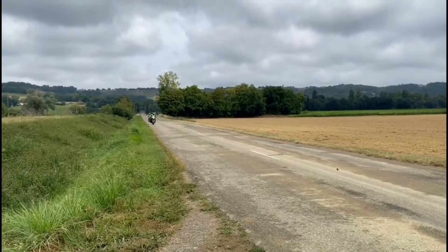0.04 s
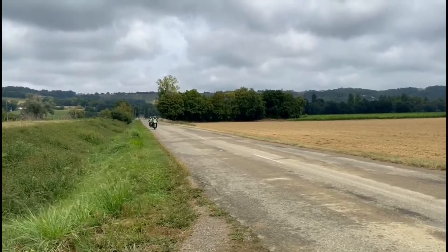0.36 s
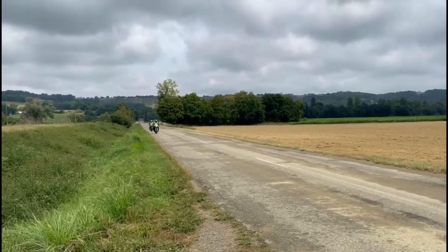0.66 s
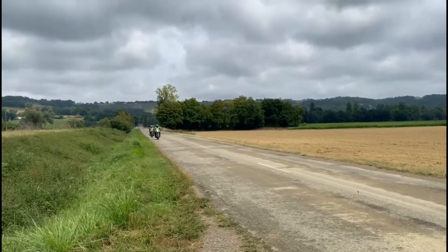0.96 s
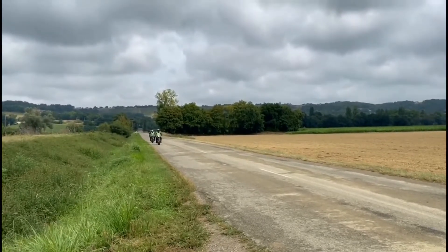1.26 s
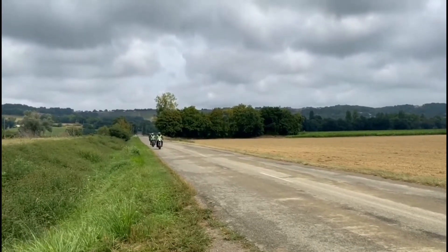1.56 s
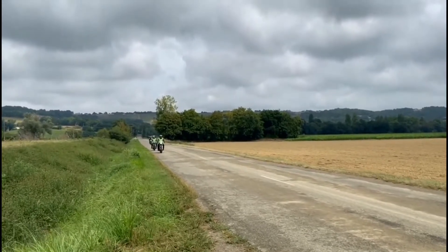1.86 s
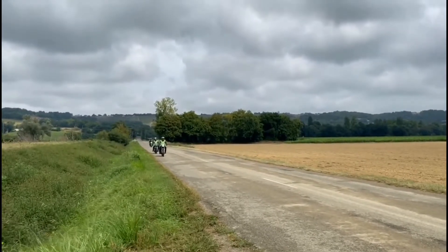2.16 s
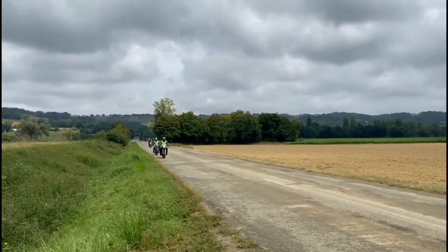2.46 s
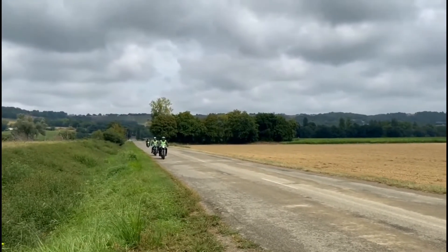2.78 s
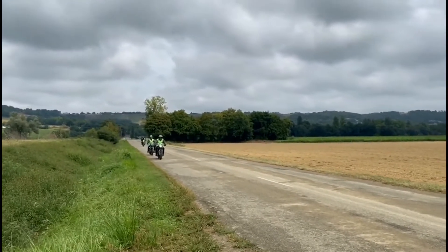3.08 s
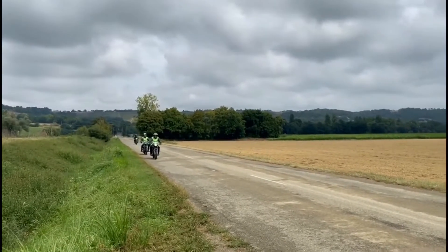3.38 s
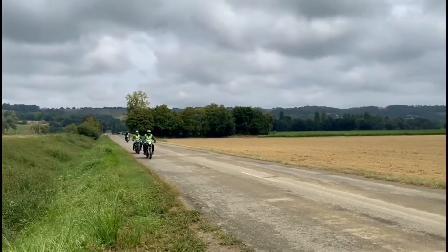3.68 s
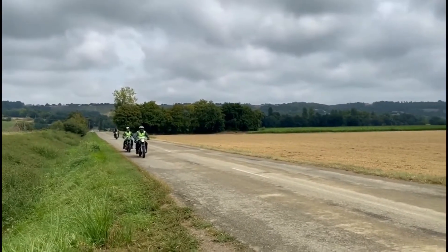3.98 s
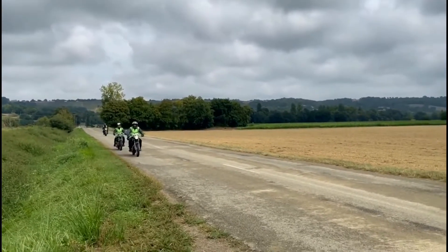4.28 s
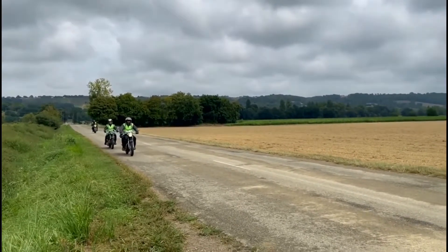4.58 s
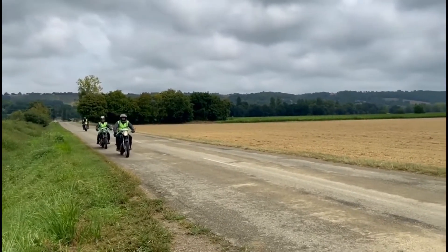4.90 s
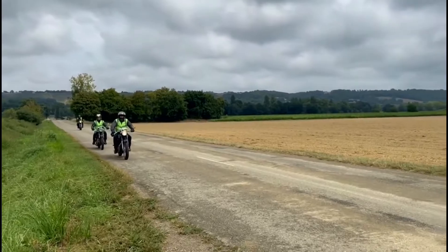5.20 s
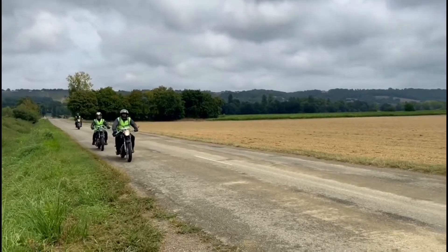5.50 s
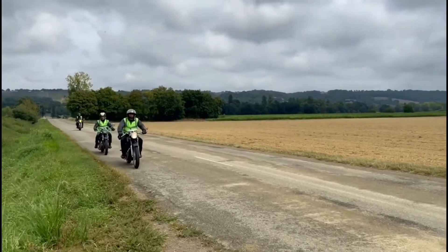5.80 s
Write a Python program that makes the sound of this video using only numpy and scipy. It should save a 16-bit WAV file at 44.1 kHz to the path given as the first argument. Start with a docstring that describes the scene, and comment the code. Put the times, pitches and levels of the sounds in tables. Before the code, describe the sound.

Three old motorcycles approach along an open country road, heard in stereo from the roadside. In the first second the leading single-cylinder engine fires unevenly, with two dull thumps and a quick string of exhaust bangs as the throttle opens. At about 1.1 seconds it settles into a fast, steady, low thumping, which slows gradually while growing louder. The two engines behind throb more dully at other rates, beating against it. Valve clatter, hiss, tyre roar and a light chain rattle build throughout. From about 2 to 4 seconds the engine metal rings thinly under load. Around 3.5 seconds the leader gains a harder, closer thud, and just after 4 seconds the clatter shifts slightly left. A soft gear whine stands out around 4.5 to 5.5 seconds. Small clicks fall near 0.2, 1.2 and 4.8 seconds, over a faint breeze rumble. The bikes are still approaching at nearly 6 seconds.

```python
"""An old single-cylinder motorcycle approaches along a country road, with two more behind it.
Each firing is an impulse that excites the resonances of a silencer. The leader fires unevenly, picks
up, then thumps steadily as its engine slows; the others, firing at other rates, beat against it.
Valve impacts ring the metal, gears whine at their mesh frequency, a chain rattles and tyres roar.
The sound grows as the distance falls, and reaches two microphone ports in a light breeze."""
import sys
import numpy as np
from scipy import signal
from scipy.fft import rfft, irfft
from scipy.io import wavfile

SR = 44100
rng = np.random.default_rng(int(sys.argv[2]) if len(sys.argv) > 2 else 0)


def generate_wav(signal):
    """Clip the signal to [-1, 1] and save it as 16-bit WAV at the path in sys.argv[1]."""
    frames = np.transpose(np.atleast_2d(signal))
    scaled = np.clip(frames, -1, 1) * 32767
    pcm = np.round(scaled).astype(np.int16)
    wavfile.write(sys.argv[1], SR, pcm)


N = 257984

# firing rates of the leading and third engines: t/s, f/Hz
LEAD_FIRING_RATE = [(0, 15.649), (.533, 14.938), (1.07, 20.141), (2.087, 18.463), (2.943, 17.685),
                    (3.809, 16.325), (5.192, 14.69), (5.85, 14.441)]
THIRD_FIRING_RATE = [(0, 14.3), (1.2, 17), (3, 14.8), (5.85, 13.3)]
# the leader's throttle, snapped open, held, then eased: t/s, opening (0-1)
THROTTLE = [(0, 0), (.58, 0.22), (.88, 1), (3.6, 0.8), (4.25, 0.69), (5.85, 0.47)]
# the leader's dull thumps at idle and hard bangs as it picks up: t/s, level/dB
IDLE_THUMPS = [(.124, -24), (.242, -25)]
EXHAUST_BANGS = [(.180, -30.5), (.320, -23.5), (.385, -29.5), (.447, -24.5), (.577, -22.5), (.645, -31),
                 (.710, -24), (.761, -25.5), (.818, -23.5), (.874, -22), (.928, -24), (.980, -22.5),
                 (1.084, -21.5)]
# small clicks close by: t/s, level/dB
CLICKS = [(.150, -29.5), (1.201, -28.5), (4.777, -27.5)]

# silencer resonances: f/Hz, bandwidth/Hz, relative level/dB
BOOM_MODES = [(60.5, 10.5, 0)]
BARK_MODES = [(125.8, 22.2, 2.2), (165.3, 7.2, 0)]
RASP_MODES = [(191, 11.5, 6), (231.7, 9.6, -4), (261.7, 19, 4.5), (299, 28, -6)]
PULL_MODES = [(256.3, 8.8, 3.5), (390, 110, -11.5), (460, 13, -2)]  # overtones while the engine pulls hardest
CRACK_MODES = [(245, 60, 0)]  # excited as the exhaust valve opens
THUD_MODES = [(102.4, 22, 0)]
BANG_MODES = [(120.4, 45, -0.49), (173, 20, 0.71)]
THUMP_MODES = [(71, 54, 0)]
FOLLOWER_MODES = [(54.9, 14.6, 3), (96.5, 30, -5), (152.2, 48, -5.5), (158, 20.7, -7.5), (230, 61, -24.5)]
# resonances of the engine's metal parts: f/Hz, bandwidth/Hz, relative level/dB
COVER_MODES = [(471, 22, -4.5), (818, 40, -11), (1456, 29, 6.5), (1636, 27, -6), (1810, 15, 6.5),
               (2344, 61, -3.5), (2945, 330, -6), (4080, 380, -5.5)]
CASTING_MODES = [(604, 72, 0.5), (699, 86, -2), (1650, 110, 2), (1780, 18, 6), (2623, 13, 3),
                 (3127, 130, -2.5), (4290, 180, -12), (6470, 6.4, -4)]
HIGH_RING_MODES = [(1430, 23, -2), (2040, 34, -7), (3120, 73, -4), (3580, 37, -5), (4100, 38, 1)]
KNOCK_MODES = [(702, 64, 0)]
METAL_RASP_MODES = [(3130, 120, 3), (3440, 190, -0.5)]

# noise spectra: f/Hz, relative spectral level/dB
TYRE_SPECTRUM = [(150, 2), (280, -4.5), (400, -3.5), (530, -6.5), (650, 0.5), (820, 1.5), (980, -5),
                 (1400, -6), (2200, -36)]
CLATTER_SPECTRUM = [(600, 7), (1000, -7.5), (1400, -1), (2100, 1.5), (3200, 0), (4100, -3.5), (4700, -1),
                    (9000, -31.5)]
HISS_SPECTRUM = [(3000, -12), (4500, -2), (5700, 3.5), (7000, 3), (8200, 0.5), (8900, -7.5), (11000, -6.5),
                 (13000, -13), (15500, -22)]
CHAIN_SPECTRUM = [(1500, -24), (3200, 6), (6500, -8.5), (9000, -1.5), (12000, -13), (15500, -13)]
BREEZE_SPECTRUM = [(20, -55), (33, -18), (48, 13.5), (62, 11.5), (85, 4), (130, 6), (200, -25), (400, -4.5),
                   (1200, -31), (3000, -53)]

# likeness of the noise at the two microphone ports: f/Hz, correlation (0-1)
PORT_CORRELATION = [(60, 1), (300, 1), (700, 0.94), (1400, 0.86), (3100, 0.74), (6000, 0.98), (9000, 0.99),
                    (15000, 0.91)]
# level of left over right, with the bikes far and near: f/Hz, level/dB
FAR_BALANCE = [(60, .3), (1200, .5), (2000, 1.5), (3300, 2.7), (5500, 4), (8000, 0)]
NEAR_BALANCE = [(60, .3), (450, .5), (740, 2), (2000, 3.5), (3300, 4), (5500, 2), (8000, 0)]
# phase lead of left over right, far and near: f/Hz, phase/rad
FAR_PHASE = [(60, 0), (1290, -0.5), (1640, 0.62), (2330, 0), (3100, 1.35), (3600, 0.7), (4500, 2.5),
             (5100, 1.35), (5400, 0.75)]
NEAR_PHASE = [(60, 0.064), (1380, 0.26), (1720, 1.4), (2400, 1), (2760, 0.97), (3700, 1.9), (4300, -1.86),
              (5500, -0.63)]
# notches in the microphone's response: f/Hz, bandwidth/Hz
MIC_NOTCHES = [(1720, 160), (7600, 520)]

NEAREST_M, SPEED_M_PER_S = 21.1, 9.32  # final distance, speed of approach
SWING_START_S, SWING_S = 3.98, 0.34  # passage from the far to the near stereo image


def lead_exhaust(turn):
    """Impulse excitation: each firing rings the silencer's modes, the narrowest for longest."""
    settled = ramp(start_s=1.1, length_s=.03)  # boom and bark are weaker until the beat settles
    near = ramp(start_s=3.3, length_s=.28)  # crack and thud come in as the throttle eases
    crack = resonate(firings(turn, rough_db=1.2, jitter_s=.0002, delay_s=.0021), CRACK_MODES)
    boom_pulses = (.7 + .3 * settled) * firings(turn, rough_db=.7, jitter_s=.0002, delay_s=.007)
    bark_pulses = (.3 + .7 * settled) * firings(turn, rough_db=1.1, jitter_s=.0002, delay_s=.0037)
    boom = butter(resonate(boom_pulses, BOOM_MODES), 64, "high", order=3)
    bark = resonate(bark_pulses, BARK_MODES)
    thud = resonate(firings(turn, rough_db=2, jitter_s=.0002, delay_s=.010), THUD_MODES)
    rasp = resonate(firings(turn, rough_db=-.5, jitter_s=.00015), RASP_MODES)
    pull = resonate(firings(turn, rough_db=2, jitter_s=.00022), PULL_MODES)
    crack = near * approach(near_db=-38, growth=1.6) * unit_band(crack, 160, 340)
    boom = approach(near_db=-24, growth=1, throttle_db=3.5) * unit_rms(butter(boom, 53, "low"))
    bark = approach(near_db=-25.5, growth=1.19, throttle_db=7.5) * unit_band(bark, 80, 200)
    thud = near * approach(near_db=-36.5, growth=2.2) * unit_band(thud, 65, 160)
    rasp = approach(near_db=-38, growth=2.53) * unit_band(rasp, 170, 400)
    pull = swell(top_db=-54, peak_s=1.68, spread_s=.89) * unit_band(pull, 220, 520)
    bangs = strikes(EXHAUST_BANGS, BANG_MODES, [70, 210], "band")
    thumps = strikes(IDLE_THUMPS, THUMP_MODES, [42, 120], "band")
    return crack + thud + boom + bark + rasp + pull + bangs + thumps


def following_exhausts(second_turn, third_turn):
    """Superposition: two dull silencers beat together, the farther ragged and smeared by echoes."""
    second = resonate(firings(second_turn, rough_db=1.4, jitter_s=.0004), FOLLOWER_MODES)
    second = butter(butter(second, 36, "high", order=3), 217, "low")
    second = approach(near_db=-28, growth=1.3) * unit_rms(second)
    third = resonate(firings(third_turn, rough_db=0, jitter_s=.00285), FOLLOWER_MODES)
    third = third + .81 * delayed(third, .02905) - .67 * delayed(third, .113)
    return second + approach(near_db=-33.5, growth=.55) * unit_band(third, 68, 240)


def tyres_and_valves(turn, second_turn):
    """Amplitude modulation: tyre roar pulses with the exhaust, clatter and hiss with the valves."""
    puffs = 1 + .5 * stroke(turn, .41, .043) + .18 * stroke(turn, .05, .1)
    valves = valve_impacts(turn, second_turn)
    rattle = unit_rms((1 + .19 * valves) * from_db(.7 * drift(67)))
    sizzle = unit_rms((1 + .22 * valves) * from_db(1.3 * drift(17)))
    roar = approach(near_db=-39.5, growth=1, throttle_db=2.5) * air_noise(TYRE_SPECTRUM)
    clatter = approach(near_db=-37.5, growth=1, throttle_db=5) * air_noise(CLATTER_SPECTRUM)
    hiss = approach(near_db=-43, growth=1.35, throttle_db=7) * air_noise(HISS_SPECTRUM)
    return roar * unit_rms(puffs) + clatter * rattle + hiss * sizzle


def valve_impacts(turn, second_turn):
    """Periodic impact: the envelope of valves landing at set phases of a cycle with varying force."""
    lead = stroke(turn, .38, .045) + .8 * stroke(turn, .52, .025) + .9 * stroke(turn, .01, .045)
    behind = sum(stroke(second_turn, phase, .025) for phase in (.28, .57, .89))
    return (lead + 1.2 * behind * ramp(SWING_START_S, length_s=1)) * from_db(2 * drift(25))


def ringing_metal(turn, second_turn):
    """Forced vibration: the valve gear chirps downward once a cycle and rings covers and castings."""
    chirp_phase = .105
    chirp_hz = 1440 + 22 * drift(90) - 130 * np.sin(2 * np.pi * (turn - chirp_phase))
    chirp = np.sin(2 * np.pi * cycles(chirp_hz)) * stroke(turn, chirp_phase, .052)
    chirp = swell(top_db=-51.5, peak_s=2.15, spread_s=1.15) * unit_rms(chirp * from_db(.6 * drift(40)))
    shaking = 1 + .5 * valve_impacts(turn, second_turn)
    covers = approach(near_db=-39.5, growth=.82, throttle_db=26) * noise_ring(COVER_MODES, shaking)
    castings = approach(near_db=-43, growth=1.24) * noise_ring(CASTING_MODES, shaking)
    high_ring = swell(top_db=-49, peak_s=3.28, spread_s=.84) * noise_ring(HIGH_RING_MODES, shaking)
    return chirp + covers + castings + high_ring


def tappets(turn):
    """Impact noise: a loose tappet snaps under load; a duller knock follows as the throttle eases."""
    snap = unit_band(air_noise() * stroke(turn, .5, .02), 3200, 4400)
    knock = noise_ring(KNOCK_MODES, stroke(turn, .39, .035) + .5 * stroke(turn, .07, .03))
    return (swell(top_db=-57, peak_s=2.6, spread_s=1) * snap
            + swell(top_db=-51, peak_s=4.46, spread_s=1) * knock)


def chain(turn):
    """Shot noise: the chain rattles in short random grains, densest when a firing tugs it."""
    spread_db, decay_s = 2.2, .003
    grains_per_s = 350 * (.5 + 2 * stroke(turn, .42, .1))
    struck = rng.random(N) < grains_per_s / SR
    sizes = struck * from_db(spread_db * np.minimum(rng.exponential(1, N), 3))
    grains = signal.lfilter([1], [1, -np.exp(-1 / (decay_s * SR))], sizes + 1e-18)
    rattle = unit_rms(air_noise(CHAIN_SPECTRUM) * grains)
    return approach(near_db=-51, growth=1.4, throttle_db=1.5) * rattle


def gear_whine(turn):
    """Phase modulation: firings shake the gear-mesh tone, which clears as the throttle eases."""
    shake = .6 * np.sin(2 * np.pi * turn) + .95 * drift(32)
    mesh = 2 * np.pi * 42.5 * turn + in_time(THROTTLE) * shake  # 42.5 teeth meet per cycle
    return approach(near_db=-48, growth=.47, throttle_db=7) * (np.sin(mesh) + .14 * np.sin(2 * mesh))


def second_whine(second_turn):
    """Gear meshing: the coasting bike gives a clear tone, preceded by a higher, rougher one."""
    mesh = 2 * np.pi * 50.25 * second_turn + .5 * drift(7)
    upper_mesh = 2 * np.pi * 67 * second_turn + .9 * drift(20)
    note = swell(top_db=-49, peak_s=5.2, spread_s=.8) * np.sin(mesh) * from_db(1.5 * drift(9))
    return note + swell(top_db=-52.5, peak_s=4.5, spread_s=.46) * np.sin(upper_mesh)


def singing_cover():
    """Resonance: under load a cover sings one sagging note, with a rasp about an octave above."""
    pitch_hz, sag_hz_per_s, peak_s = 1437, 22, 3.4
    hz = pitch_hz - sag_hz_per_s * (seconds() - peak_s) + 5 * drift(18)
    ring = swell(top_db=-53, peak_s=peak_s, spread_s=.44) * np.sin(2 * np.pi * cycles(hz))
    return ring + approach(near_db=-46, growth=1, throttle_db=18) * noise_ring(METAL_RASP_MODES)


def nearby_clicks():
    """Heavy damping: two broad resonances die away so fast that they are heard as clicks."""
    return strikes(CLICKS, [(1330, 700, 0), (1890, 800, 0)], 2500, "low")


def breeze():
    """Wind noise: a faint rumble, uncorrelated between the two ports."""
    spectrum = rfft(rng.standard_normal((2, N))) * from_db(at_bins(BREEZE_SPECTRUM))
    return from_db(-50) * unit_rms(irfft(spectrum, N))


def coasting_rate():
    """Power-law run-down: the second engine's firing rate falls quickly, then levels out."""
    start_hz, end_hz, run_down_s, power = 17.131, 12.275, 6.464, 2.953
    return end_hz + (start_hz - end_hz) * (1 - ramp(0, run_down_s)) ** power


def cycles(hz, start=0):
    """Phase, in cycles, is the integral of frequency."""
    return start + np.cumsum(hz) / SR


def firings(turn, rough_db, jitter_s, delay_s=0):
    """A pulse train: one impulse a cycle, scattered in strength and timing."""
    at = np.flatnonzero(np.diff(np.floor(turn), prepend=-1) > 0)
    timing, strength = rng.standard_normal((len(at), 2)).T
    at = at + ((delay_s + timing * jitter_s) * SR).astype(int)
    pulses = np.zeros(N)
    pulses[np.clip(at, 0, N - 1)] = from_db(rough_db * strength)
    return pulses


def stroke(turn, centre, width):
    """A periodic Gaussian gate; centre and width are in cycles."""
    return np.exp(-.5 * (((turn - centre + .5) % 1 - .5) / width) ** 2)


def resonate(x, modes):
    """Modal superposition: damped resonators in parallel, with alternating signs."""
    out = 0
    for k, (hz, width, db) in enumerate(modes):
        r = np.exp(-np.pi * width / SR)
        poles = [1, -2 * r * np.cos(2 * np.pi * hz / SR), r * r]
        gain = (-1) ** k * from_db(db) * (1 - r * r) / 2
        out = out + gain * signal.lfilter([1, 0, -1], poles, x + 1e-18)
    return out


def noise_ring(modes, envelope=1):
    """Random excitation: modes driven by noise under an envelope, at unit power."""
    return unit_rms(resonate(air_noise() * envelope, modes))


def strikes(rows, modes, edge_hz, kind):
    """Filtered impulse responses, scaled together to peak at the highest listed level."""
    times, db = np.transpose(rows)
    impulses = np.zeros(N)
    impulses[(times * SR).astype(int)] = from_db(db)
    sound = butter(resonate(impulses, modes), edge_hz, kind)
    return sound * from_db(db.max()) / np.abs(sound).max()


def approach(near_db, growth, throttle_db=0):
    """Spreading loss: gain goes as 1 / distance ** growth, throttle_db lower with the throttle shut."""
    distance_m = NEAREST_M + SPEED_M_PER_S * (N / SR - seconds())
    return from_db(near_db + throttle_db * (in_time(THROTTLE) - 1)) * (NEAREST_M / distance_m) ** growth


def swell(top_db, peak_s, spread_s):
    """A Gaussian envelope, 8.7 dB down at spread_s from its peak."""
    return from_db(top_db) * np.exp(-((seconds() - peak_s) / spread_s) ** 2)


def ramp(start_s, length_s):
    """A linear rise from 0 to 1."""
    return np.clip((seconds() - start_s) / length_s, 0, 1)


def air_noise(spectrum=None):
    """Partial coherence: stereo noise whose sides are alike in the bass and least so near 3 kHz."""
    mid, side = rfft(rng.standard_normal((2, N)))
    alike = np.clip(at_bins(PORT_CORRELATION), 0, 1)
    pair = np.sqrt(1 + alike) * mid + np.sqrt(1 - alike) * side * [[1], [-1]]
    return unit_rms(irfft(pair * (from_db(at_bins(spectrum)) if spectrum else 1), N))


def drift(corner_hz):
    """Random fluctuation: low-passed noise of unit power."""
    hz = np.fft.rfftfreq(N, 1 / SR)
    return unit_rms(irfft(rfft(rng.standard_normal(N)) / (1 + (hz / corner_hz) ** 2), N))


def ports(sound, balance, phase):
    """Direction cues: level and phase differ between left and right at each frequency."""
    half = np.array([[.5], [-.5]])
    return irfft(rfft(sound) * from_db(half * at_bins(balance)) * np.exp(1j * half * at_bins(phase)), N)


def delayed(x, delay_s):
    """Propagation delay."""
    return np.interp(np.arange(N) - delay_s * SR, np.arange(N), x, left=0)


def butter(x, edge_hz, kind, order=2):
    """Causal Butterworth filter."""
    return signal.sosfilt(signal.butter(order, edge_hz, kind, fs=SR, output="sos"), x + 1e-18)


def unit_band(x, low_hz, high_hz):
    """Band-pass, then scale to unit power."""
    return unit_rms(butter(x, [low_hz, high_hz], "band"))


def unit_rms(x):
    """Scale to unit power."""
    return x / np.sqrt(np.mean(x ** 2) + 1e-20)


def from_db(db):
    """Decibels to amplitude ratio."""
    return 10 ** (np.asarray(db) / 20)


def seconds():
    """The time of every sample."""
    return np.arange(N) / SR


def in_time(rows):
    """A curve interpolated at every sample."""
    return np.interp(seconds(), *np.transpose(rows))


def at_bins(points):
    """A spectrum interpolated in log frequency at every FFT bin."""
    hz, values = np.transpose(points)
    return np.interp(np.log(np.fft.rfftfreq(N, 1 / SR) + 1), np.log(hz), values)


def scene():
    """Superposition: three motorcycles add at two ports, their image passing from far to near."""
    turn = cycles(in_time(LEAD_FIRING_RATE), start=.238)
    second_turn = cycles(coasting_rate(), start=.369)
    third_turn = cycles(in_time(THIRD_FIRING_RATE), start=.406)
    exhausts = lead_exhaust(turn) + following_exhausts(second_turn, third_turn)
    running = tyres_and_valves(turn, second_turn)
    metal = ringing_metal(turn, second_turn) + tappets(turn) + chain(turn)
    tones = gear_whine(turn) + second_whine(second_turn) + singing_cover()
    sound = exhausts + running + metal + tones + nearby_clicks()
    far_image = ports(sound, FAR_BALANCE, FAR_PHASE)
    near_image = ports(sound, NEAR_BALANCE, NEAR_PHASE)
    near = ramp(SWING_START_S, SWING_S)
    return (1 - near) * far_image + near * near_image + breeze()


def record(dry):
    """Frequency response: the microphone has two narrow notches and a steep treble cut-off."""
    cutoff_hz = 15700
    for hz, width in MIC_NOTCHES:
        dry = butter(dry, [hz - width / 2, hz + width / 2], "stop")
    return signal.sosfilt(signal.ellip(12, .1, 90, cutoff_hz, fs=SR, output="sos"), dry)


dry = scene()
out = record(dry)
generate_wav(out)
```